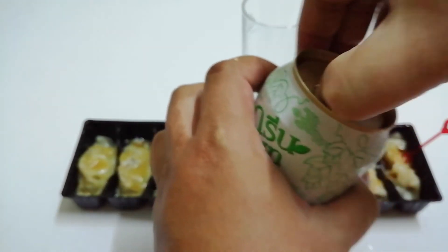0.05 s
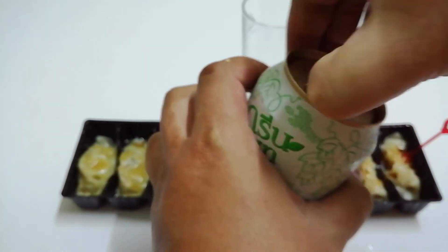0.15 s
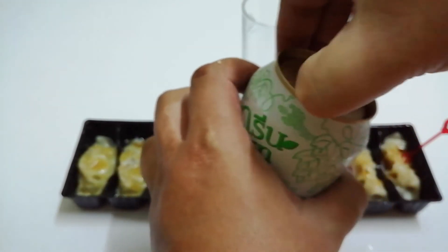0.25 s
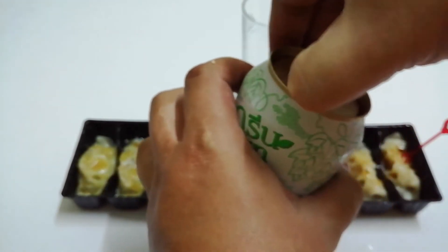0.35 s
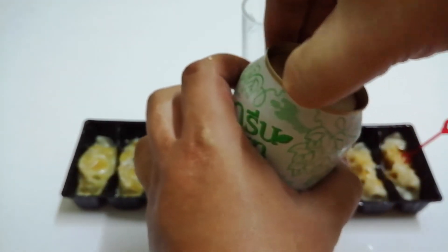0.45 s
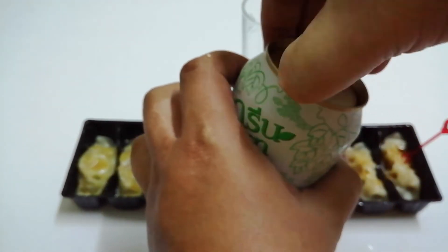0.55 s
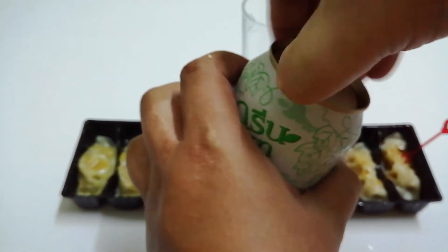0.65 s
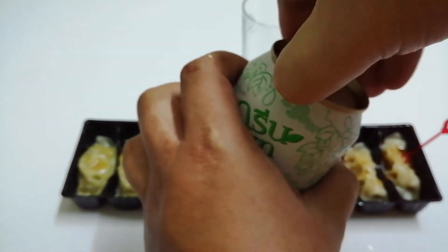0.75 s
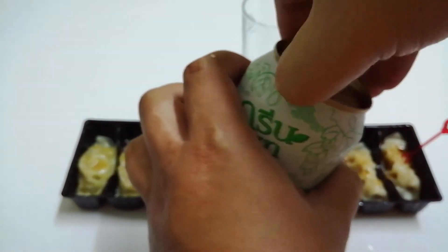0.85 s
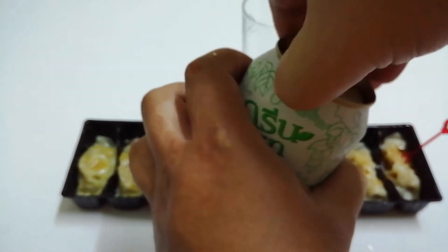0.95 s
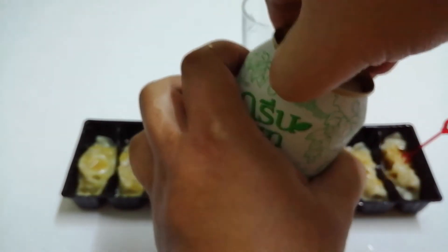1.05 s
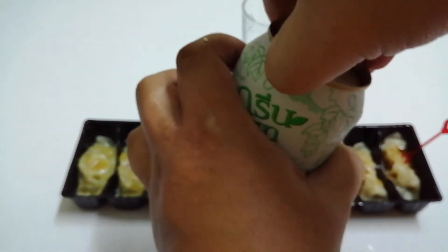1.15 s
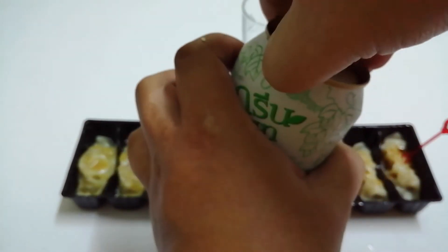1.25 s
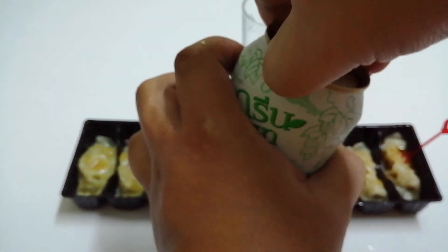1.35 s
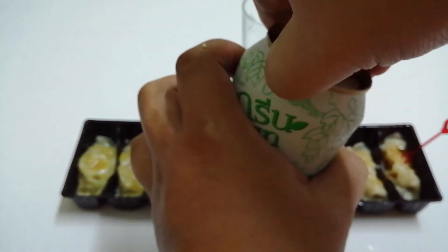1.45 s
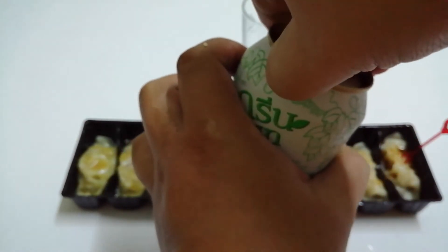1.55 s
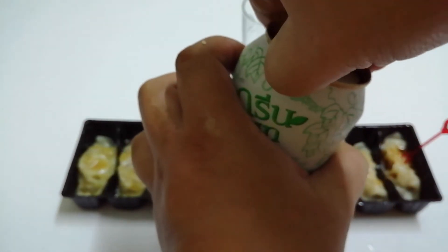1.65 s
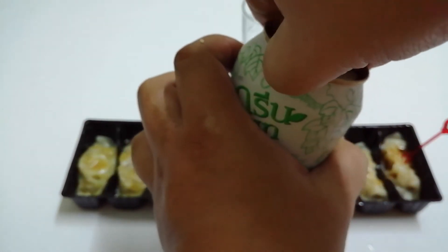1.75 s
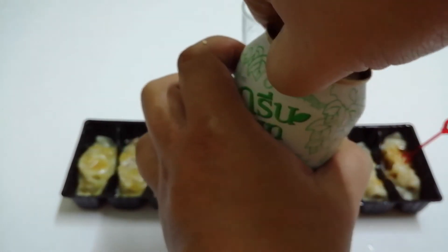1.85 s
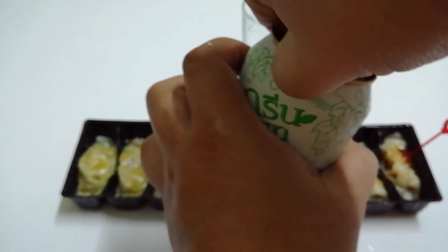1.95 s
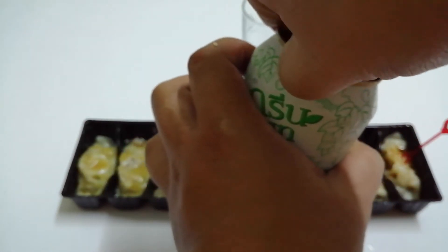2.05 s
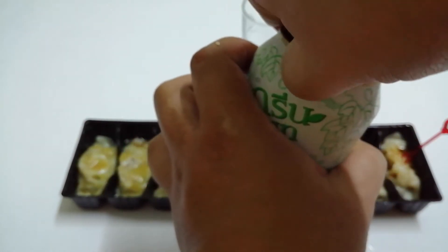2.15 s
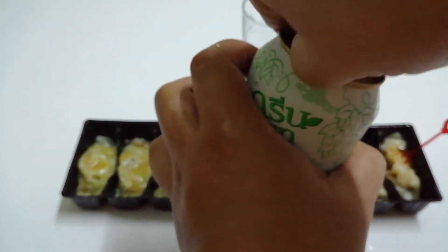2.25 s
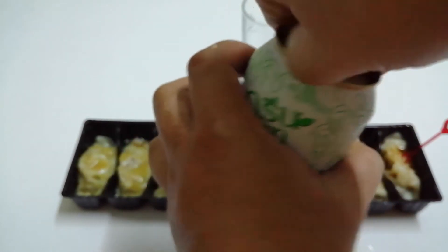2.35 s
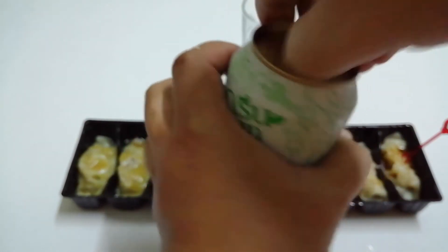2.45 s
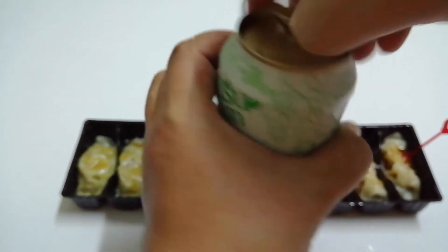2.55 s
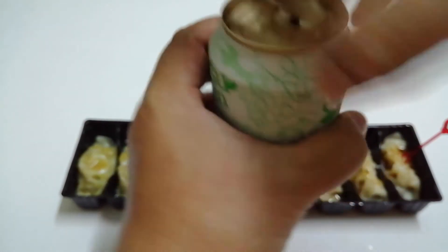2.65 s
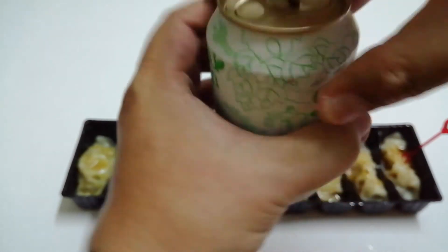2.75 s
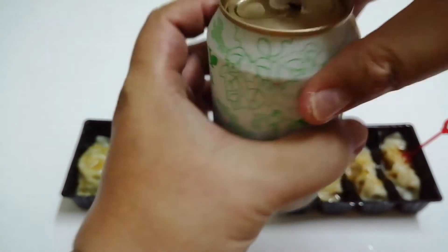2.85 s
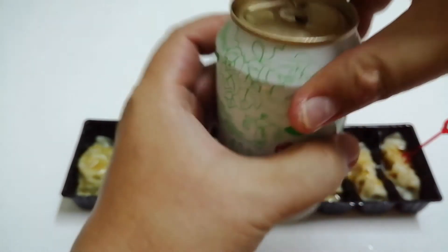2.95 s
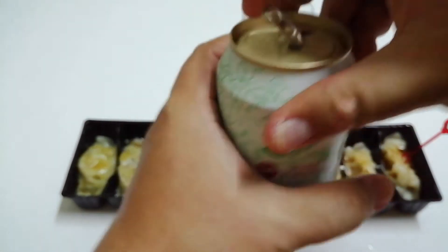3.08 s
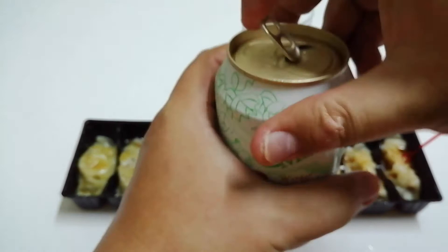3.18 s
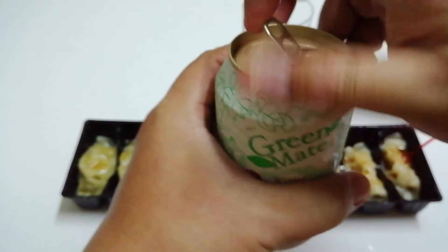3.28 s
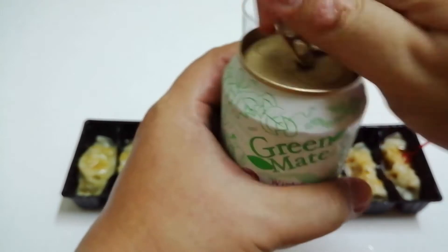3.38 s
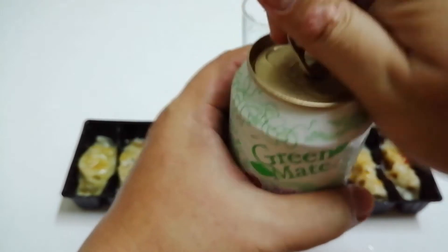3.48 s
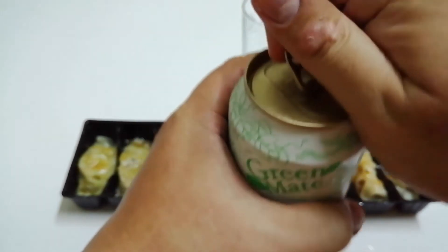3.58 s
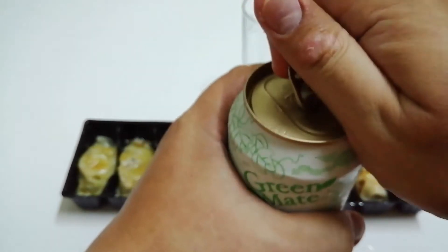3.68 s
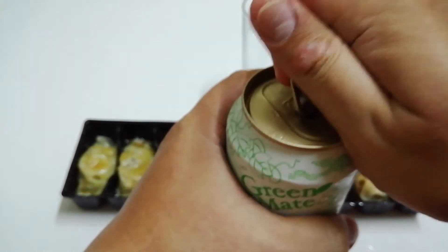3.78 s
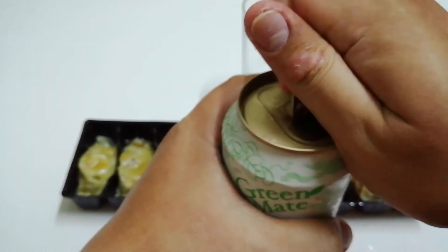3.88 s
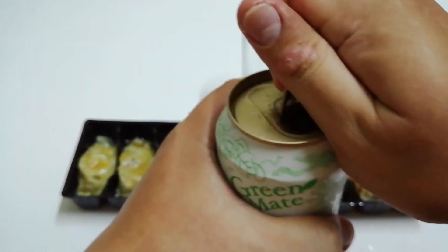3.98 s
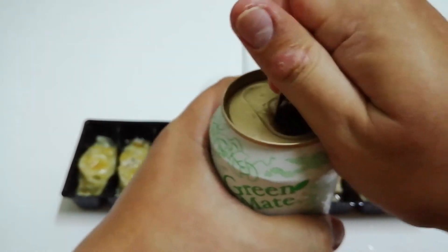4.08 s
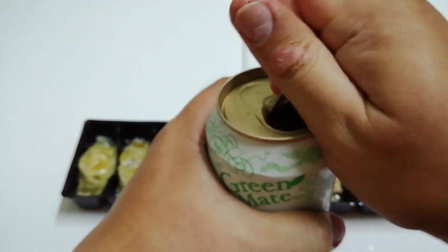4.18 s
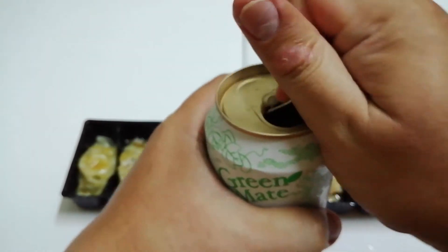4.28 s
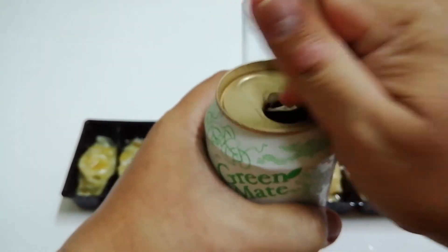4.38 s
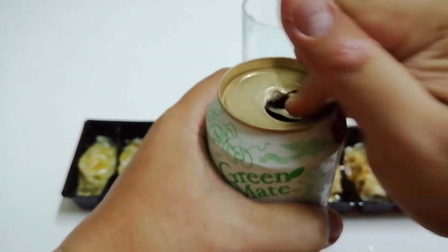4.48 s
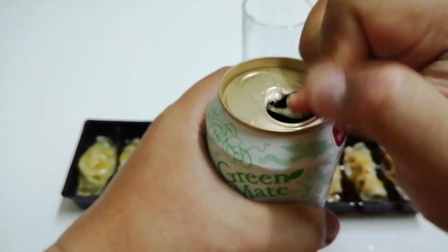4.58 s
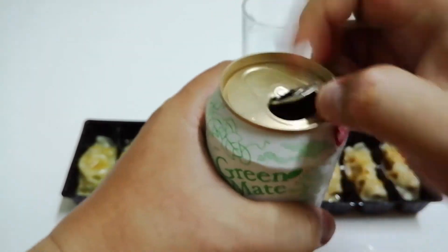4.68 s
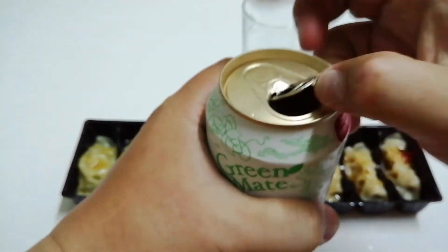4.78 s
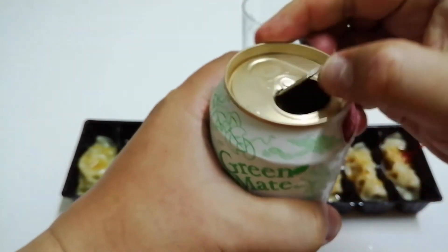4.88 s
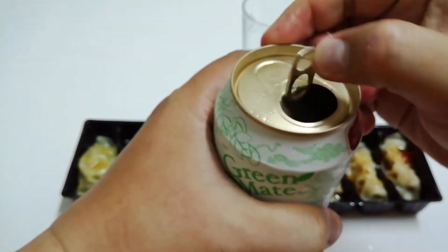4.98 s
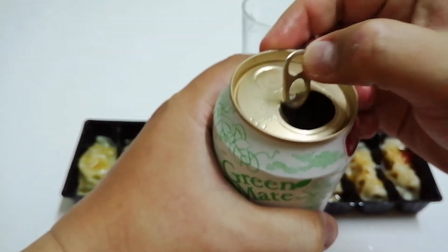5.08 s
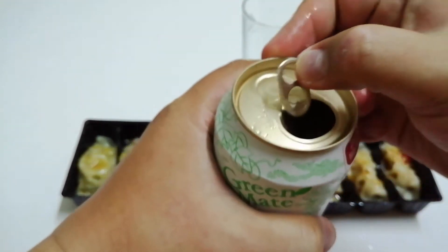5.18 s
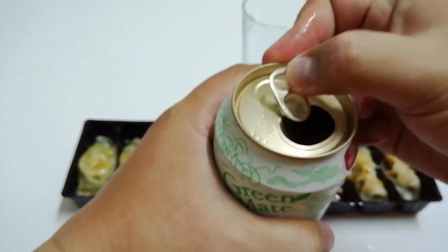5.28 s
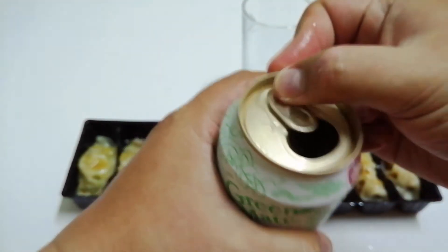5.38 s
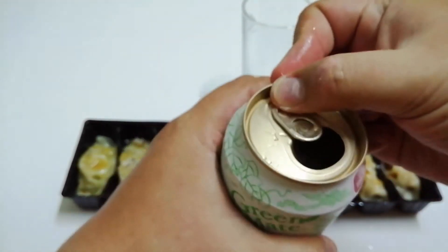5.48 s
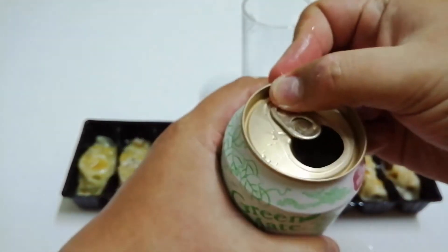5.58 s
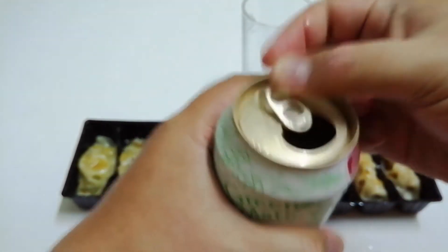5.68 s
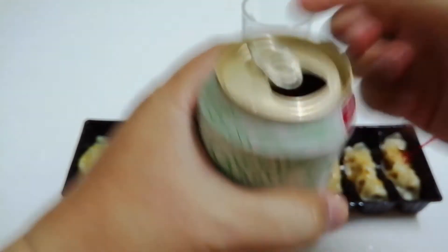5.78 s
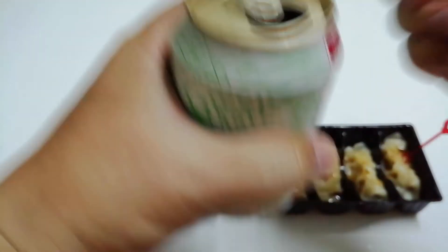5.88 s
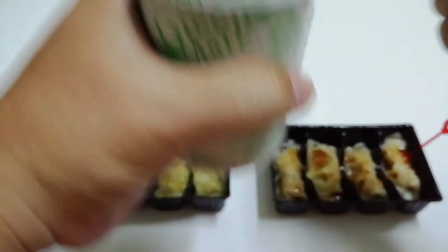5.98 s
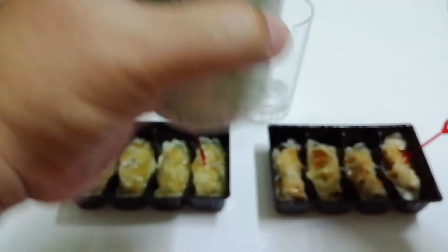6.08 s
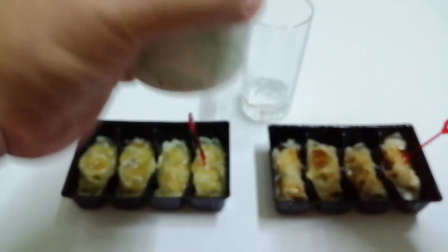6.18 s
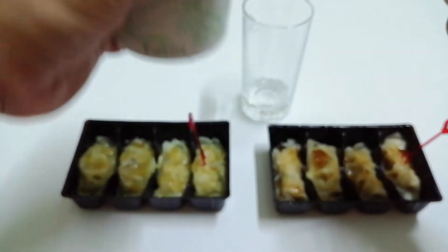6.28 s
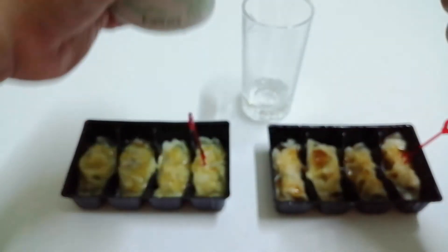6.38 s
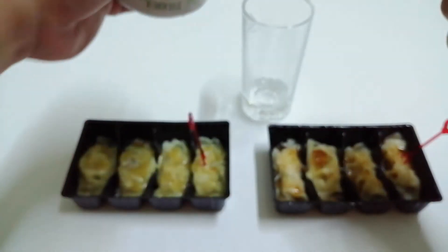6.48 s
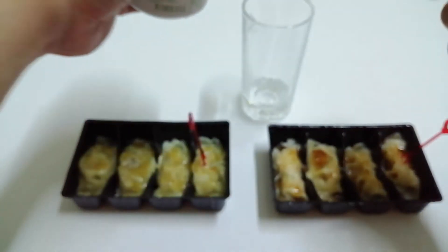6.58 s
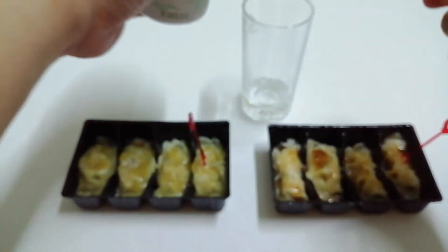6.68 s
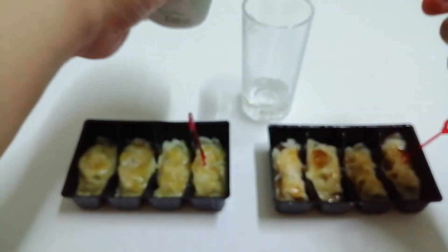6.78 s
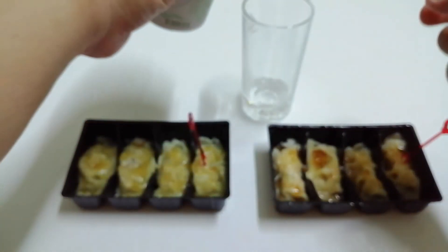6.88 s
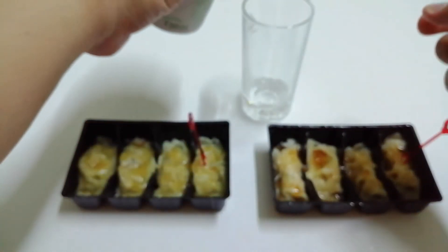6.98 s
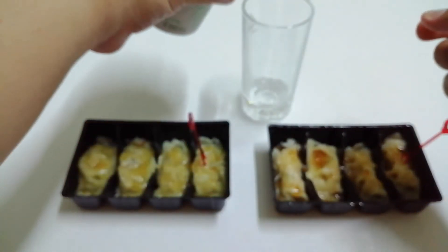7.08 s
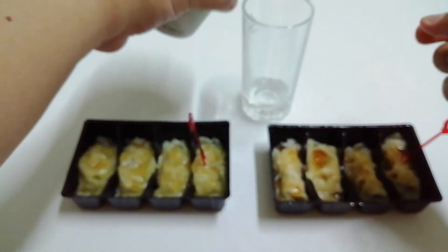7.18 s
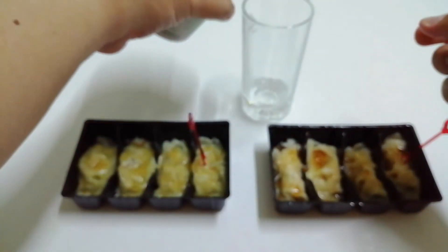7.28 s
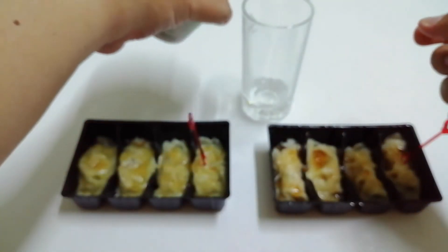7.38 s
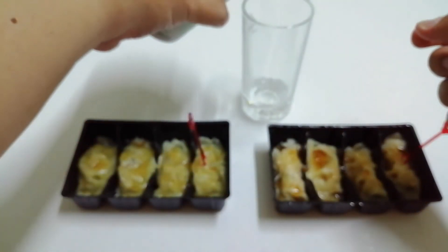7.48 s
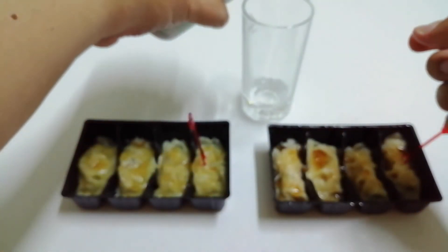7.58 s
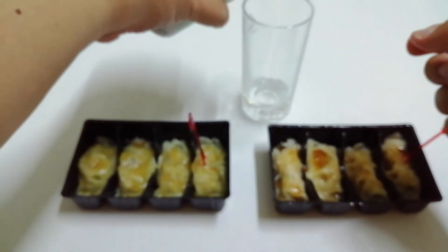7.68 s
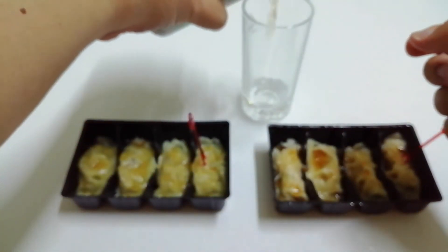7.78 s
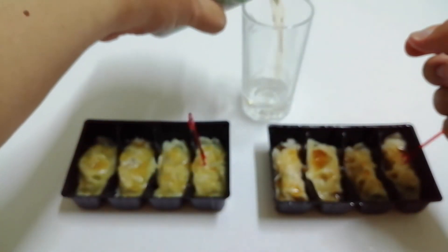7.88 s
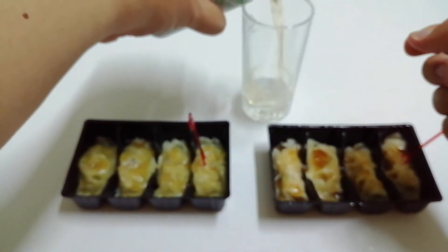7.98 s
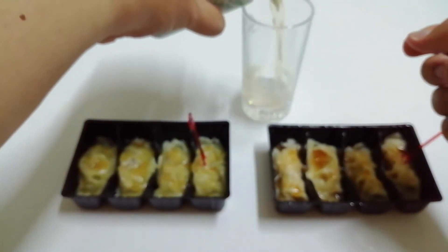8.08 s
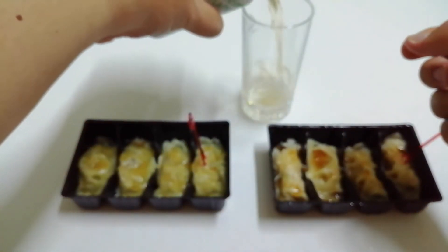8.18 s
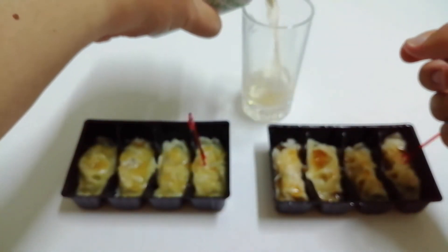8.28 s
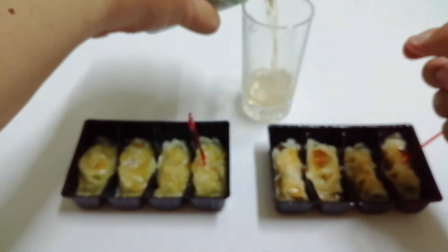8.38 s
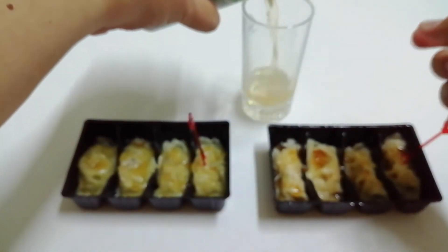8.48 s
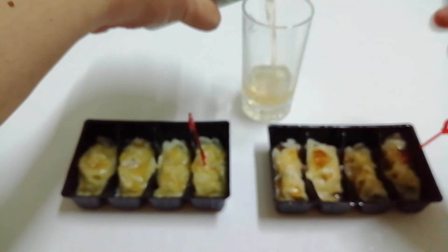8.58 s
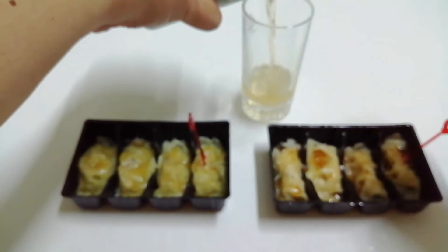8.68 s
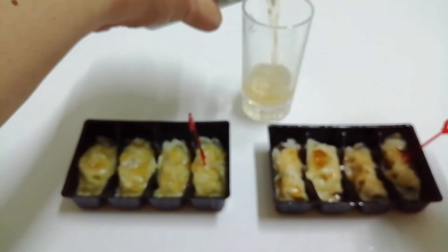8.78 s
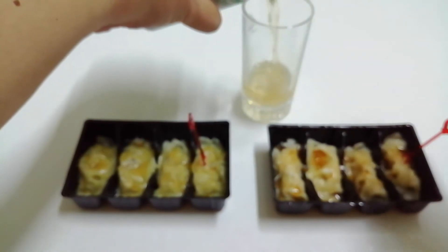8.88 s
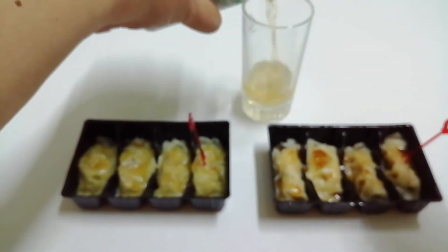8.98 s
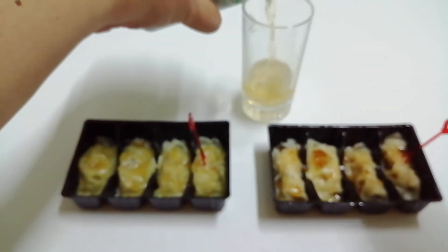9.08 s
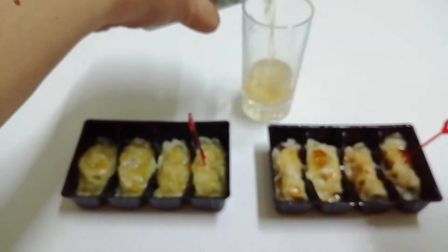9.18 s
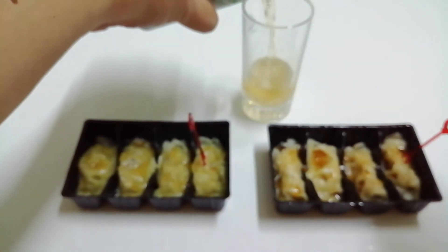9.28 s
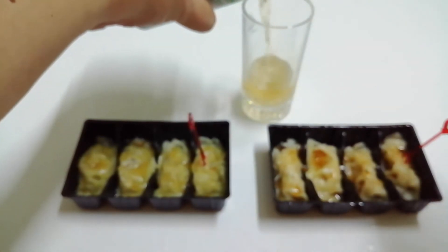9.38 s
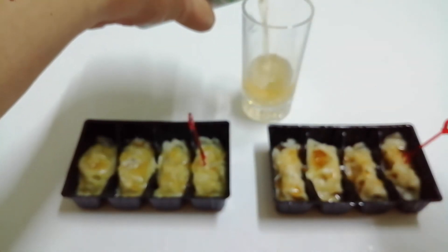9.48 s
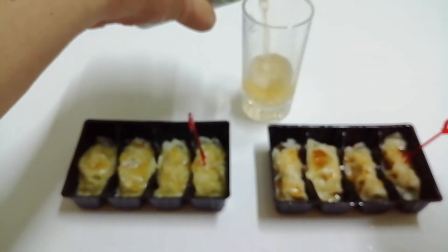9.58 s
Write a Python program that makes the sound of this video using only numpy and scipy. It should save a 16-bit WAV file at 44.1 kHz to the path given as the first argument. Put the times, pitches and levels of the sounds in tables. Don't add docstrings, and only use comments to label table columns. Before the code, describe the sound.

Faint metallic ticks on a drink can, a sharp double pop with brief hiss, tearing lid and clinks, then gulping, bubbling pour into a glass.

```python
import sys
import numpy as np
from scipy import signal
from scipy.fft import rfft, irfft, next_fast_len
from scipy.io import wavfile
from scipy.ndimage import map_coordinates

SR = 44100
rng = np.random.default_rng(int(sys.argv[2]) if len(sys.argv) > 2 else 0)


def waveform_to_disk(signal):
    frames = np.transpose(np.atleast_2d(signal))
    scaled = np.clip(frames, -1, 1) * 32767
    samples = np.round(scaled).astype(np.int16)
    wavfile.write(sys.argv[1], SR, samples)


def makeup_ratio(level_db):
    decades = np.asarray(level_db, float) / 20
    return 10 ** decades


N = 425124

# start in seconds, peak in dB, lid in dB, low kick in dB, crack t60 in seconds.
POPS = [
    (2.2246, -1.5, -17, -16.5, 0.0069),
    (2.274, -5, -20, -18, 0.011),
]
# start in seconds, rasp in dB, rise in dB/s, fall in dB/s, air space in dB.
TEAR = [
    (3.945, -30, 699, 165, -14),
    (4.18, -50.5, 900, 153, -11),
    (4.301, -41.5, 264, 242, -17),
]
# frequency in Hz, width in Hz, level in dB.
LID = [(1600, 1200, -4), (2340, 340, 0), (3120, 754, -3)]
# frequency in Hz, width in Hz, level in dB.
EDGE = [(8670, 3500, -3), (10030, 1300, 3.5), (11800, 3300, -5), (15100, 1600, -6.5)]
# time in seconds, frequency in
# Hz.
AIR = [(2.5, 1336), (3.9, 786), (4.1, 832), (4.18, 971), (4.3, 1078), (5.5, 1085), (5.75, 966), (6.1, 875)]
# frequency in Hz, width in Hz, level in dB.
BELLY = [(258.3, 29, 4.5), (489.5, 23, -10)]
# time in seconds, frequency in Hz.
COLUMN = [(8.47, 850), (8.9, 844.6), (9.0, 931), (9.64, 1025)]


def unit(x):
    return x / np.sqrt(np.mean(x ** 2) + 1e-20)


def along(points, hz):
    f, v = np.transpose(points)
    return np.interp(np.log(hz + 1), np.log(f + 1), v)


def curves(rows, off=None):
    s, *cols = np.transpose(rows)
    return [np.interp(np.arange(N) / SR, s, c, off, off) for c in cols]


def wobble(rate):
    knots = rng.standard_normal(int(N * rate / SR) + 4)
    return map_coordinates(knots, [np.arange(N) * rate / SR])


def filtered(x, response):
    m = next_fast_len(N + 8192)
    return irfft(rfft(x, m) * response(np.fft.rfftfreq(m, 1 / SR)), m)[..., :N]


def pair(size, alike):
    a, b = rng.standard_normal((2, size))
    turn = np.arccos(np.clip(alike, -1, 1)) / 2
    shared, own = np.cos(turn) * a, np.sin(turn) * b
    return np.array([shared + own, shared - own])


def rush(spectrum, alike, grain_db, grain_hz):
    grains = pair(N, alike) * makeup_ratio(grain_db * wobble(grain_hz))
    return unit(filtered(grains, lambda hz: makeup_ratio(along(spectrum, hz))))


def resonate(x, modes):
    out = 0
    for k, (hz, width_hz, db) in enumerate(modes):
        out = out + (-1) ** k * makeup_ratio(db) * signal.lfilter(*signal.iirpeak(hz, hz / width_hz, SR), x)
    return out


def gliding(hz, width_hz):
    return unit(wobble(width_hz) * np.sin(2 * np.pi * np.cumsum(hz) / SR))


def crack(modes, t60, alike, size=3000, rise_s=0.00063):
    t = np.arange(size) / SR
    force = (makeup_ratio(-60 * t / t60) + 0.057 * makeup_ratio(-12 * t / t60)) * (1 - np.exp(-t / rise_s)) ** 2
    x = resonate(pair(len(t), alike) * force, modes)
    x = resonate(x, modes)
    return x / np.abs(x).max()


def ring(hz, t60, rise_s, chirp=0):
    t = np.arange(int(SR * min(abs(t60), .6)) + 64) / SR
    x = np.sin(2 * np.pi * hz * t * (1 + chirp * t / t60))
    x = x * makeup_ratio(-60 * t / t60) * (1 - np.exp(-t / rise_s)) ** 2
    return x / np.abs(x).max()


def add(out, s, x):
    i = round(s * SR)
    out[:, i:i + x.shape[-1]] += x[..., :N - i]


def ports(x, balance):
    gains = lambda hz: makeup_ratio(np.outer([.5, -.5], along(balance, hz)))
    return filtered(x, lambda hz: gains(hz) / gains(hz).mean(axis=0))


def seal():
    # time in seconds, level in dB.
    vent = [(2.227, -20), (2.255, -22), (2.271, -32), (2.28, -28.5), (2.31, -43.5), (2.4, -43.5),
            (2.5, -55.5), (2.7, -84)]
    # frequency in Hz, level in dB per Hz.
    gas = [(240, -53), (400, -23), (742, -19.5), (1250, -16.5), (2250, -8), (3990, -15.5), (4900, -8),
           (5600, 4), (6500, -10), (7510, -13), (9610, -9), (15000, -20), (16000, -23.5)]
    # frequency in Hz, width in Hz, level in dB.
    seal_modes = [(5600, 2200, 3.5), (7480, 780, -6), (9400, 1400, -3.5), (13100, 1900, -8)]
    out = np.zeros((2, N))
    for s, db, lid_db, _, t60 in POPS:
        plate = crack(LID, t60, 1.0) + 0.55 * crack([(2540, 1800, 0)], t60, 0.52)
        pop = crack(seal_modes, t60, 0.32) + makeup_ratio(lid_db + 4) * plate
        pop = pop + 0.25 * crack([(8000, 12000, 0)], .003, .4)
        add(out, s - .0005, makeup_ratio([[db + 4.0], [db + 0.5]]) * pop)
    return out + makeup_ratio(curves(vent, -200)[0] - 2.5) * rush(gas, 0.26, grain_db=-0.5, grain_hz=410)


def lid_cracks():
    # start in seconds, peak, lid, air and edge in dB.
    tab = [(0.552, -26.5, -15.5, -36.5, -11), (1.0702, -41, -7, -39, -25), (1.5545, -40, -10, -23, -5.5),
           (2.479, -29, -3, -22, -17), (3.3702, -30.5, -26, -42, -8), (3.8809, -34, -3, -24, -10),
           (3.9415, -11, -2, -8, 5.5), (4.5144, -38.5, 0.5, 4.5, -4), (4.7246, -29.5, 1, 4.5, 1.5),
           (4.7567, -37.5, 0, -9, -8), (5.435, -22, -2, -8.5, 0.5), (5.7509, -30.5, -7, -7.5, -5),
           (6.11, -39.5, 2.5, -2, -19.5), (7.057, -36, -5, -32, -9), (7.2784, -26.5, -9.5, -50, -4)]
    # start in seconds, peak in dB, edge in dB.
    score = [(3.9071, -25.5, -0.5), (3.9134, -24, -20), (3.924, -22, -22), (3.931, -26, -12),
             (3.965, -32, -2), (3.974, -26, 3), (3.985, -33, 5), (3.994, -37, 5), (4.0028, -34, 12),
             (4.053, -35, 3), (4.169, -43, 8), (4.177, -35, 11), (4.185, -49, 12), (4.2008, -43, -5),
             (4.2178, -29, -2), (4.2305, -35.5, 13), (4.253, -47, 10), (4.261, -45, 8), (4.271, -40.5, 5),
             (4.2798, -35, 11), (4.292, -28, -15), (4.3002, -24, 6), (4.305, -26, 0), (4.3872, -41, 11)]
    # frequency in Hz, width in Hz, level in dB.
    sheet = [(4400, 1600, -3.5), (5580, 980, 5.5), (6850, 1400, 0)]
    out = np.zeros((2, N))
    air_hz, = curves(AIR)
    snaps = []
    for s, db, edge_db in score:
        lid_db = -4.5 - 26 * (s - TEAR[0][0])
        opened_db = 12 * (s > TEAR[1][0] - .05)
        air_db = -45 + 0.45 * (db + 21.5) - db + opened_db
        snaps.append((s, db, lid_db, air_db, edge_db))
    for s, db, lid_db, air_db, edge_db in [*tab, *snaps]:
        hz = air_hz[round(s * SR)]
        metal = crack(sheet, 0.013, 0.043) + makeup_ratio(edge_db) * crack(EDGE, 0.0116, 0.085)
        metal = metal + makeup_ratio(lid_db) * crack(LID, 0.018, 0.21)
        add(out, s - .001, makeup_ratio(db - 3.0) * metal)
        add(out, s - .001, makeup_ratio(db + air_db - 5.0) * crack([(hz, 200, 0), (0.99 * hz, 500, -5)], 0.03, 1.0))
        add(out, s - .001, makeup_ratio(db + air_db - 1.5) * ring(hz, 0.037, 0.0011))
    return out


def tearing():
    # frequency in Hz, level in dB per Hz.
    rasp_spectrum = [(710, -37), (1200, -12), (3290, -5), (3470, -3), (4220, -7.5), (5590, -2.5),
                     (8170, -7), (9930, -1.5), (12600, -11.5), (14800, -10.5), (16000, -20.5)]
    out, t = np.zeros((2, N)), np.arange(N) / SR
    air_hz, = curves(AIR)
    rasp = rush(rasp_spectrum, 0.25, grain_db=4.5, grain_hz=608)
    air = gliding(air_hz, width_hz=280) * makeup_ratio(5.4 * wobble(40))
    for s, db, rise_db, fall_db, air_db in TEAR:
        below_db = np.maximum(rise_db * (s - t), fall_db * (t - s))
        out += makeup_ratio(db - 3.0 - below_db) * (rasp + makeup_ratio(air_db) * air)
    return out


def can_modes():
    # start in seconds, frequency in Hz, peak in dB, t60 in seconds.
    wall = [(5.752, 750, -41.5, 0.41), (4.73, 1130, -58, 0.15), (4.305, 3560, -41.5, 0.17),
            (5.752, 3600, -55, 0.12), (6.112, 3150, -55.5, 0.16), (4.73, 3160, -38, 0.029)]
    # start in seconds, frequency in Hz, peak in dB, t60 in seconds.
    clinks = [(2.225, 2680, -11, 0.0055), (2.225, 3350, -27, 0.029), (2.2745, 5340, -9.5, 0.035),
              (2.48, 636, -46.5, 0.035), (2.483, 2990, -45, 0.064), (2.782, 5400, -59.5, .03),
              (3.095, 3450, -59.5, .015), (3.242, 3540, -57, 0.014), (3.243, 4870, -55, .015),
              (3.7, 2076, -61, 0.018), (4.726, 808, -40.5, 0.077), (4.868, 9400, -52, 0.018),
              (5.435, 3266, -28, 0.022), (5.436, 5580, -28.5, 0.03), (5.751, 946, -41, 0.22),
              (5.751, 6800, -34, 0.03), (5.752, 5520, -38, 0.025), (5.753, 3530, -38.5, 0.031),
              (6.111, 638, -45, 0.046), (7.011, 2300, -53, .06), (7.011, 4700, -56, .03),
              (7.057, 2250, -50, .05), (7.056, 3080, -47, 0.099), (7.057, 5600, -42, 0.027),
              (2.478, 1328, -44, .03), (4.725, 1086, -22.5, .13), (4.724, 5350, -34, .03),
              (4.868, 7400, -53, .03)]
    out = np.zeros((2, N))
    for s, hz, db, t60 in wall:
        add(out, s, makeup_ratio(db) * crack([(hz, 15 / t60, 0)], 0.25, 1.0, size=7000))
    for s, hz, db, t60 in clinks:
        add(out, s - .001, makeup_ratio(db - 6) * ring(hz, t60, 0.0016))
        add(out, s - .001, makeup_ratio(db - 4) * crack([(hz, 18 / t60, 0)], 0.77 * t60, 0.5))
    return out


def finger_rubs():
    # centre in seconds, half length in seconds, frequency in Hz, width in Hz, level in dB.
    rubs = [(1.962, 0.087, 670, 96, -62), (2, 0.05, 1100, 120, -67.5), (2.9, 0.025, 4770, 800, -70),
            (3.601, 0.07, 2230, 120.5, -72), (5.02, 0.014, 1156, 67, -57.5),
            (5.687, 0.012, 1050, 120.5, -61.5), (7.059, 0.0052, 2340, 180, -59),
            (7.089, 0.039, 4900, 1800, -59), (7.282, 0.0027, 2361, 400, -46)]
    out = np.zeros((2, N))
    for s, half, hz, width_hz, db in rubs:
        u, mode = np.arange(-3 * half, 3 * half, 1 / SR) / half, [(hz, width_hz, 0)]
        slide = unit(resonate(resonate(pair(len(u), 0.61), mode), mode))
        add(out, s - 3 * half, makeup_ratio(db) * np.exp(-u * u / 2) * slide)
    return out


def gulps():
    # start in seconds, peak in dB, frequency in Hz.
    pockets = [(8.411, -51, 885), (8.435, -44, 860), (8.456, -38, 864), (8.471, -22, 940),
               (8.49, -22.5, 860), (8.511, -16.5, 810), (8.518, -20, 940), (8.536, -17, 840),
               (8.556, -22.5, 830), (8.583, -30, 855), (8.605, -16.5, 866), (8.631, -11.5, 920),
               (8.638, -19.5, 920), (8.647, -21, 904), (8.689, -18.5, 900), (8.724, -28, 914),
               (8.741, -16, 917), (8.75, -24, 856), (8.763, -22, 782), (8.783, -22, 780), (8.796, -20, 886),
               (8.8215, -21, 770), (8.834, -17, 818), (8.847, -21, 920), (8.884, -25.5, 783)]
    out, t = np.zeros((2, N)), np.arange(SR // 20) / SR
    u = t / 0.0015
    burst = (u / 3 * np.exp(1 - u / 3)) ** 3
    for s, db, hz in pockets:
        add(out, s - .0025, makeup_ratio(db) * burst * np.sin(2 * np.pi * hz * t * (1 + 0.52 * t)))
    return out


def glugs():
    # start in seconds, peak in dB, belly in dB.
    column_glugs = [(8.918, -30, -11), (8.954, -24.5, -13), (9.002, -37, -15), (9.025, -24, -7),
                    (9.064, -34, 10), (9.117, -49, 9), (9.152, -27, -3), (9.189, -24, -15),
                    (9.212, -40, -27), (9.254, -20, -39), (9.304, -36.5, -14), (9.311, -35, -15),
                    (9.363, -43, -8), (9.398, -39, -20), (9.432, -32, -9), (9.527, -37, 1),
                    (9.559, -31, -4), (9.578, -30, -12), (9.598, -29.5, -7), (9.618, -30.5, -4)]
    # start in seconds, peak in dB, belly in dB.
    knocks = [(8.209, -47.5, -28), (8.409, -35, -26), (9.429, -36, -20), (9.398, -32, -24),
              (9.467, -28.5, -14), (9.492, -22.5, -2.5)]
    out = np.zeros((2, N))
    column_hz, = curves(COLUMN)
    blows = [(s, db, belly_db, column_hz[round(s * SR)]) for s, db, belly_db in column_glugs]
    blows += [(s, db, belly_db, 1253) for s, db, belly_db in knocks]
    for s, db, belly_db, hz in blows:
        add(out, s - .002, makeup_ratio(db - 4.0) * crack([(hz, 220, 0)], 0.06, 0.31))
        add(out, s - .002, makeup_ratio(db - 5.5) * ring(hz, 0.076, 0.0011, chirp=0.027))
        belly_hz = BELLY[1][0] * rng.normal(1, 0.018)
        add(out, s - .002, makeup_ratio(db + belly_db) * ring(belly_hz, 0.091, 0.00078))
    return out


def plinks():
    # start in seconds, peak in dB, frequency in Hz.
    drops = [(8.0808, -50, 4050), (8.1194, -35, 3180), (8.1341, -27.5, 2360), (8.186, -35, 2120),
             (8.2344, -39.5, 3250), (8.259, -33.5, 2340), (8.2853, -30.5, 2326), (8.362, -30.5, 2390),
             (8.3896, -43, 2130), (8.4075, -40, 2410), (8.4205, -35, 2450), (8.4878, -44, 2310),
             (8.5332, -45, 2520), (8.5537, -31.5, 2320), (8.5756, -31, 3650), (8.5915, -29, 2350),
             (8.623, -33, 4060), (8.6576, -30.5, 2410), (8.6849, -38, 2530), (8.696, -35, 2500),
             (8.7228, -28, 2410), (8.7685, -30, 2400), (8.7857, -23, 2390), (8.8585, -33, 2420),
             (8.877, -32.5, 1550), (8.9175, -34, 2380), (8.933, -27.5, 2130), (8.996, -41, 2900),
             (9.021, -35, 2640), (9.0827, -29, 2384), (9.1039, -30.5, 2660), (9.1513, -40, 2190),
             (9.1623, -32, 2380), (9.1882, -32, 2440), (9.2112, -37, 2410), (9.2321, -38, 2370),
             (9.2511, -30, 2340), (9.2641, -27.5, 2870), (9.29, -32, 2640), (9.3131, -25.5, 2554),
             (9.3823, -37, 3460), (9.4077, -30, 3020), (9.4272, -28.5, 2200), (9.4626, -32, 2160),
             (9.4906, -31, 2130), (9.5085, -26.5, 2910), (9.5379, -28.5, 3060), (9.618, -35, 1910)]
    out = np.zeros((2, N))
    for s, db, hz in drops:
        add(out, s - .001, makeup_ratio(db - 7) * ring(hz, 0.036, 0.0011, chirp=0.05))
        add(out, s - .001, makeup_ratio(db - 1.0) * crack([(hz, 700, 0)], 0.028, 0.38))
    return out


def spits():
    # start in seconds, peak in dB, frequency in Hz, edge in dB.
    bursts = [(8.082, -29.5, 5170, -21), (8.119, -27, 5500, -16), (8.1914, -35.5, 5800, -15),
              (8.2404, -38.5, 5940, -11), (8.265, -28, 5800, -15), (8.2888, -33, 7100, -21),
              (8.3189, -25.5, 5320, -19), (8.363, -22, 6000, -16.5), (8.3915, -23.5, 5720, -20),
              (8.426, -25.5, 4530, -11), (8.4389, -20, 6150, -20), (8.4609, -28.5, 6120, -8),
              (8.5996, -38, 4630, -5), (8.624, -28.5, 4540, -9), (8.7189, -20, 5910, -23),
              (8.739, -30, 6000, -10), (8.7486, -23.5, 5690, -13), (8.775, -36, 5800, -6),
              (8.7862, -30, 5750, -16), (8.8281, -20, 5810, -14), (8.877, -30, 5660, -4),
              (8.9189, -33, 4700, -7), (9.0207, -40, 5330, -5), (9.077, -29, 5880, -17),
              (9.1602, -30, 6130, -17), (9.1595, -26, 4700, -15), (9.1882, -25, 5600, -21),
              (9.2062, -17, 5890, -18), (9.233, -28, 5860, -8), (9.2641, -17.5, 5100, -17.5),
              (9.3095, -29.5, 5970, -11), (9.3496, -34, 5030, -11), (9.383, -36.5, 4400, -23),
              (9.4077, -35, 5100, -19), (9.4606, -28, 5100, -23), (9.4881, -34, 5760, -11),
              (9.5105, -22.5, 5850, -4), (9.537, -26, 5140, -6), (9.5489, -25, 4960, -13),
              (9.5574, -24, 5670, -4.5), (9.5943, -28.5, 7970, -10), (9.6178, -20, 4990, -4.5)]
    out = np.zeros((2, N))
    for s, db, hz, edge_db in bursts:
        body = 0.84 * crack([(hz, 1100, 0)], 0.011, 0.13, rise_s=0.0013)
        edge = makeup_ratio(edge_db + 4.5) * crack(EDGE, 0.011, 0.11, rise_s=0.00134)
        add(out, s - .0015, makeup_ratio(db - 0.5) * (body + edge))
        add(out, s - .0015, makeup_ratio(db - 9.5) * ring(hz, 0.014, 0.0018))
    return out


def bubbles(spectrum, count, centre_hz, spread, cycles, size_db, alike):
    u, z = rng.random((count, 2)), rng.standard_normal((count, 2))
    hz = np.clip(centre_hz * np.exp(spread * z[:, :1]), 300, 17500)
    c = np.arange(320) / SR * hz
    grain = np.sin(2 * np.pi * c * (1 + 0.102 * c / cycles))
    grain = grain * np.exp(-3 * c / cycles) * (1 - np.exp(-c / 2.0)) ** 2
    grain = grain * makeup_ratio(np.minimum(-size_db * np.log(u[:, :1]), 13))
    at = ((8 + u[:, 1:] * (N / SR - 8)) * SR).astype(int) + np.arange(320)
    lag = np.round((1 - alike) * 8 * z[:, 1:]).astype(int)
    x = np.array([np.bincount((at + k * lag).ravel(), grain.ravel(), N + SR)[:N] for k in (0, 1)])
    x = filtered(x, lambda f: makeup_ratio(along(spectrum, f)))
    return x / np.sqrt(np.mean(x[:, 8 * SR:] ** 2))


def stream():
    # time in seconds, level in dB.
    flow = [(8.06, -68), (8.2, -67.5), (8.42, -50), (8.7, -44.5), (8.97, -51), (9.12, -51.5), (9.25, -42.5),
            (9.4, -51), (9.55, -48)]
    # frequency in Hz, level in dB per Hz.
    splash_spectrum = [(710, -24), (1200, -6.5), (1260, -4), (1460, -11), (1710, -14), (1850, -12.5),
                       (2380, -6.5), (4050, -14), (4500, -7.5), (5850, -43), (9900, -120)]
    fizz_spectrum = [(2240, -33), (3800, -13), (4180, -22.5), (4980, -3), (5420, -6.5), (5860, -3),
                     (6650, -11), (8410, -11), (8870, -19), (9370, 0), (10800, -10.5), (15600, 4),
                     (16100, -32.5)]
    # frequency in Hz, level in dB.
    mist_tilt = [(6500, -5), (8000, 6)]
    now = np.arange(N) / SR
    column_hz, = curves(COLUMN)
    splash_db, = curves([(8.0, -130), *flow])
    after = lambda s: .5 + .5 * np.tanh((now - s) / 0.013)
    belly_db = splash_db - 19.5 * np.clip(9.04 - now, 0, .7)
    trap_db, free_db = 6, -2
    column_db = splash_db + trap_db - 30 * (1 - after(8.47)) + (free_db - trap_db) * after(8.92)
    fizz_db = -51 + 0.46 * (splash_db + 51.0)
    clumps = 3.3 * wobble(40)

    out = makeup_ratio(belly_db - 2) * unit(resonate(pair(N, .85), BELLY))
    column = gliding(column_hz, width_hz=110) + 0.12 * gliding(np.full(N, 1260), width_hz=79)
    deep = (after(8.73) - after(9.36)) * gliding(np.full(N, 700), width_hz=220)
    out += makeup_ratio(column_db + clumps) * unit(column + 0.95 * deep)
    splash = bubbles(splash_spectrum, count=3200, centre_hz=2610, spread=0.517, cycles=14.3,
                     size_db=5.0, alike=0.4)
    out += makeup_ratio(splash_db + 1.1 * clumps + 1.5) * splash
    mist = rush(fizz_spectrum, .3, grain_db=0.0, grain_hz=90)
    mist = filtered(mist, lambda f: makeup_ratio(along(mist_tilt, f)))
    out += makeup_ratio(fizz_db + 5.5 + .6 * clumps - 40 * (2 - after(6.8))) * mist
    fizz = bubbles(fizz_spectrum, count=5500, centre_hz=6210, spread=0.327, cycles=24.5,
                   size_db=3.0, alike=0.39)
    return out + makeup_ratio(fizz_db - 4.5 + 1.8 * clumps + 1.1) * fizz


def spray():
    # start in seconds, peak in dB, frequency in Hz.
    sprays = [(8.2406, -42.5, 8100), (8.3624, -36, 11900), (8.4257, -32.5, 10000), (8.4856, -32, 14800),
              (8.6857, -39, 9420), (8.7185, -31, 9360), (8.749, -30, 9150), (8.782, -28, 10000),
              (8.828, -16.5, 9110), (8.8889, -34, 9650), (8.9237, -27.5, 9700), (9.0079, -38, 11700),
              (9.1017, -34.5, 9400), (9.1883, -27, 9810), (9.2326, -30.5, 9740), (9.2848, -34, 9550),
              (9.4815, -37, 9640), (9.4908, -33.5, 9590), (9.4967, -25, 9610), (9.5939, -22, 9760)]
    out, u = np.zeros((2, N)), np.arange(-3, 3, 1 / (SR * 0.00094))
    for s, db, hz in sprays:
        puff = resonate(pair(len(u), .3) * np.exp(-u * u / 2), [(hz, 800, 0), (14000, 4000, -17)])
        add(out, s - .002, makeup_ratio(db + 0.9) * puff / np.abs(puff).max())
    return out


def kicks():
    # time in seconds, level in dB.
    draught = [(8.1, -64.5), (8.2, -47), (8.24, -62), (8.3, -39), (8.38, -50), (8.45, -74)]
    out, t = np.zeros((2, N)), np.arange(SR // 2) / SR
    kick = -np.exp(-t / 0.0013) * (1 - np.exp(-t / 0.00048)) + .03 * np.exp(-t / .1)
    for s, db, _, kick_db, _ in POPS:
        add(out, s + 0.0012, makeup_ratio(db + kick_db + 10.0) * kick * [[1], [.1]])
    return out + makeup_ratio(curves(draught, -200)[0] + 11.5) * unit(wobble(170)) * [[1], [.12]]


def room(x):
    # frequency in Hz, t60 in seconds.
    decay = [(300, 0.57), (2000, 0.48), (6000, 0.4), (12000, 0.096)]
    hz, t, z = signal.stft(rng.standard_normal((2, SR // 2)), SR, nperseg=256)
    tail = signal.istft(z * makeup_ratio(-60 * t / along(decay, hz)[:, None]), SR, nperseg=256)[1]
    delayed = np.pad(x, ((0, 0), (200, 0)))
    return signal.fftconvolve(delayed, tail / np.linalg.norm(tail[0]), axes=1)[:, :N]


def floor():
    # time in seconds, level in dB.
    duck = [(2.2, -55), (2.3, -70), (2.45, -68.5), (2.62, -57), (3.8, -59.5), (4.14, -62.5), (4.49, -53.5),
            (7.9, -56), (9.0, -50.5)]
    # frequency in Hz, level in dB per Hz.
    hum_spectrum = [(12, -39.5), (20, -7), (70, -14), (103, 5.5), (168, -10), (247, -5.5), (270, -9),
                    (343, -8), (375, -11), (700, -23), (910, -51.5), (1540, -120)]
    hiss_spectrum = [(240, -32.5), (400, -1.5), (520, -9.5), (676, -4.5), (906, -5.5), (1630, -13.5),
                     (2050, -12), (3120, -14), (4050, -22.5), (5850, -12), (6540, -5.5), (6950, -11.5),
                     (7750, -26.5), (9760, -17.5), (11400, -23), (15050, -22.5), (15250, -59.5)]
    # frequency in Hz, level in dB.
    motor = [(49, -67), (100, -66), (146, -63.5), (193, -66.5), (243, -66), (343, -68)]
    # frequency in Hz, likeness from 0 to 1.
    likeness = [(60, 0.23), (130, .88), (300, 0.91), (640, 0.11)]
    # frequency in Hz, left over right in dB.
    far = [(60, 2), (130, 5), (640, 3.5), (4100, 3), (5900, 10.5), (7600, 5), (9500, -7), (11500, 0.5)]
    level_db, = curves(duck)
    turn = lambda hz: np.arccos(np.clip(along(likeness, hz), -1, 1)) / 2
    colour = lambda hz: makeup_ratio(along(hum_spectrum, hz)) * [np.cos(turn(hz)), np.sin(turn(hz))]
    mid, side = filtered(rng.standard_normal((2, N)), colour)
    lines = sum(makeup_ratio(db + 62) * gliding(np.full(N, hz), width_hz=22) for hz, db in motor)
    hum = makeup_ratio(level_db - 2.5) * (unit(np.array([mid + side, mid - side])) + 0.57 * lines)
    hiss_db = -65 + 2.0 + 0.5 * (level_db + 58.0)
    hiss = makeup_ratio(hiss_db) * rush(hiss_spectrum, 0, grain_db=1.42, grain_hz=30.2)
    return ports(hum + hiss, far)


def scene():
    # frequency in Hz, left over right in dB.
    near = [(100, 1), (450, 3.5), (3000, 3.5), (4400, 7.5), (6000, 15.5), (7600, 2.5), (9200, -11.5),
            (11000, -4.5), (15000, 2)]
    tin = seal() + lid_cracks() + tearing() + can_modes() + finger_rubs()
    drink = gulps() + glugs() + plinks() + spits() + stream() + spray()
    answer = room(makeup_ratio(-13.0) * tin + makeup_ratio(-10.0) * drink)
    return ports(tin + drink + answer, near) + kicks() + floor()


def top_cut(x):
    return signal.sosfilt(signal.butter(12, 16150, fs=SR, output="sos"), x)


def record(dry):
    clipped = np.clip(dry, -1, 1)
    mix = filtered(clipped, lambda hz: 1 / (1 + (hz / 16300) ** 60))
    return top_cut(mix)


dry = scene()
out = record(dry)
waveform_to_disk(out)
```